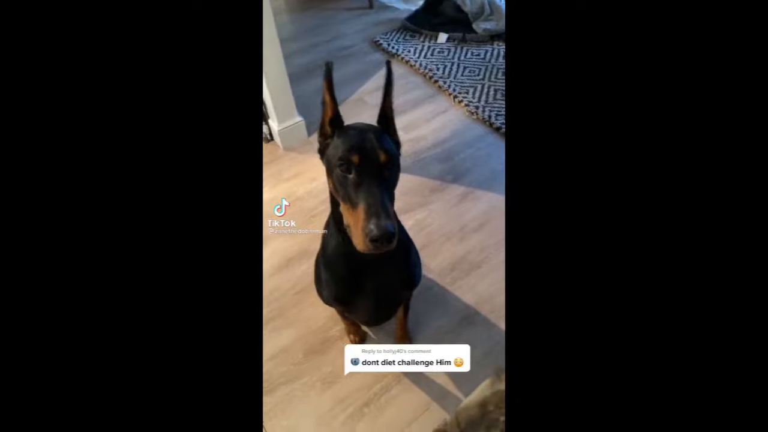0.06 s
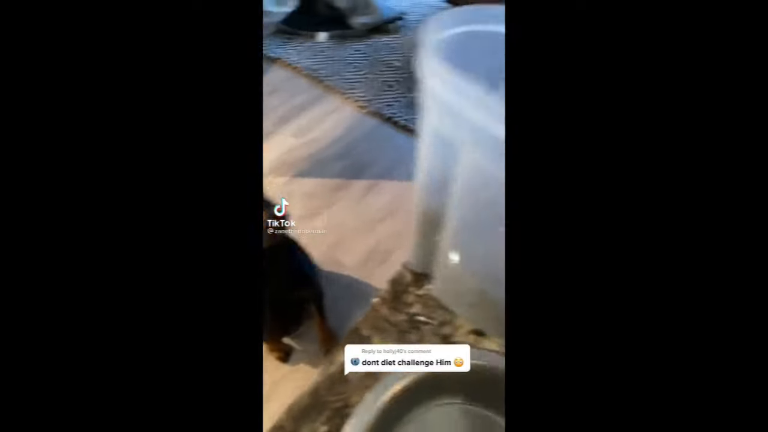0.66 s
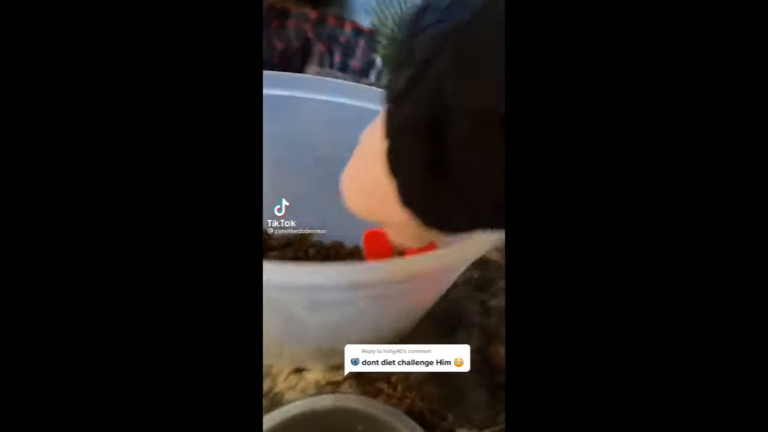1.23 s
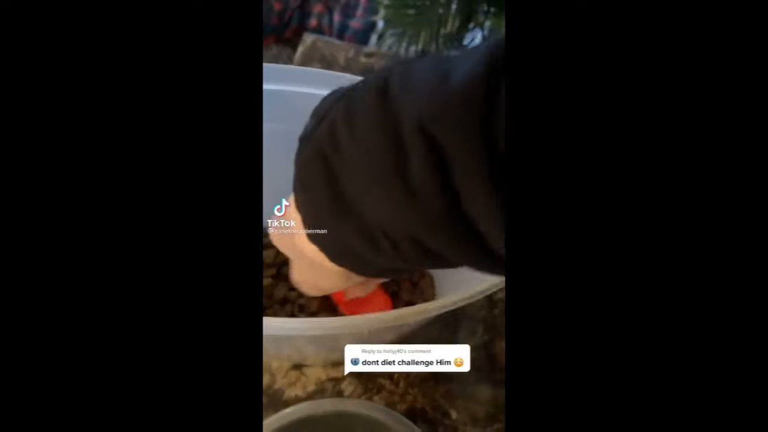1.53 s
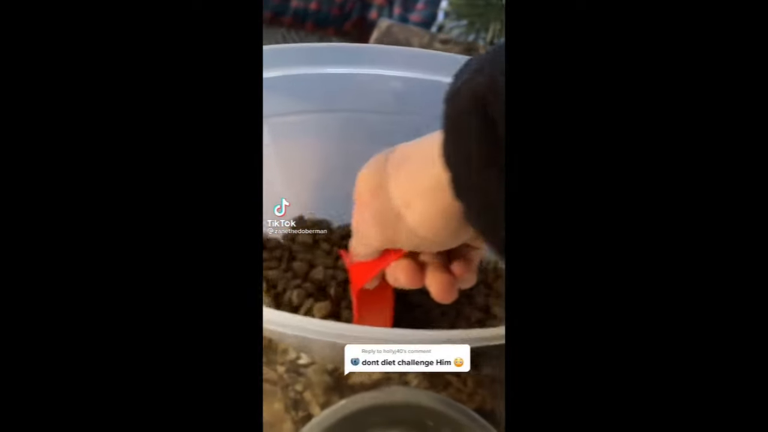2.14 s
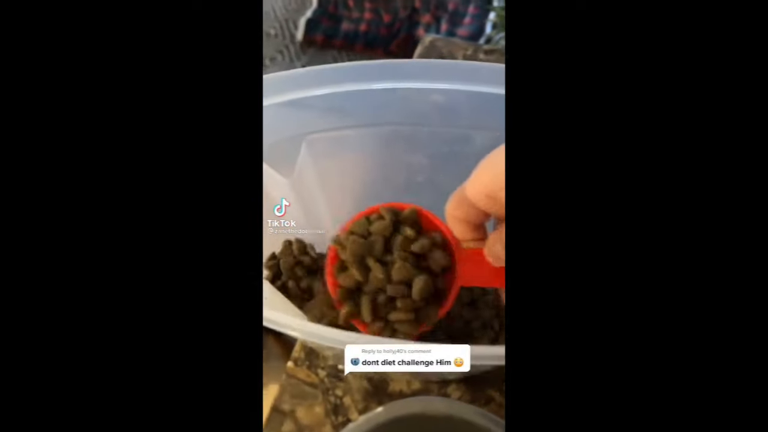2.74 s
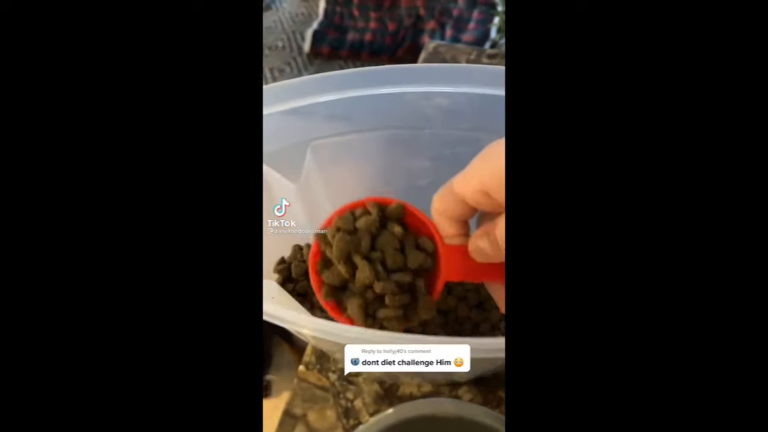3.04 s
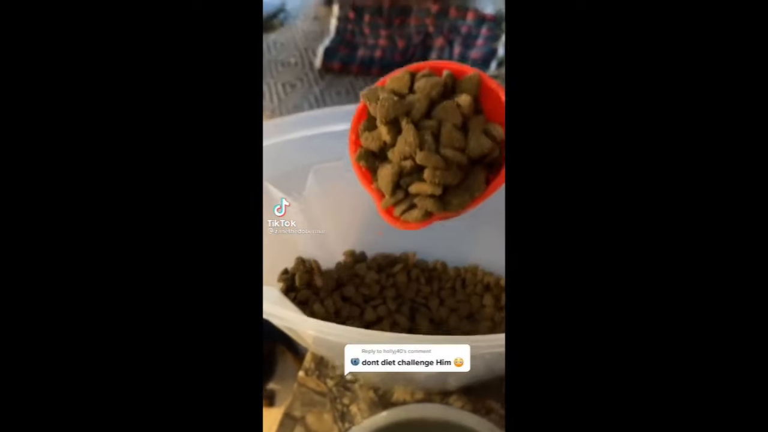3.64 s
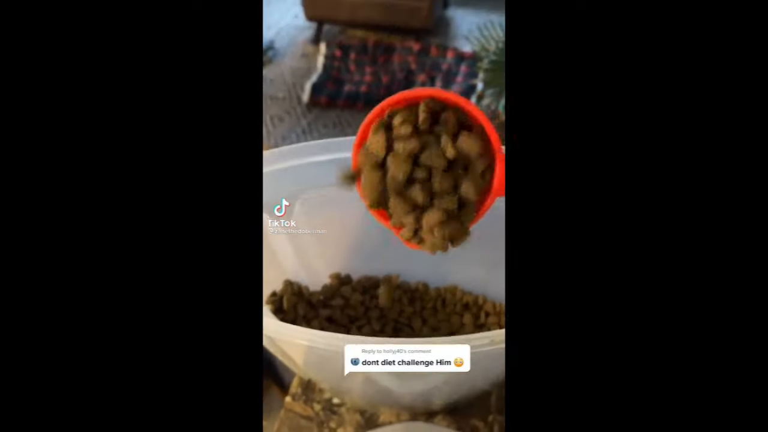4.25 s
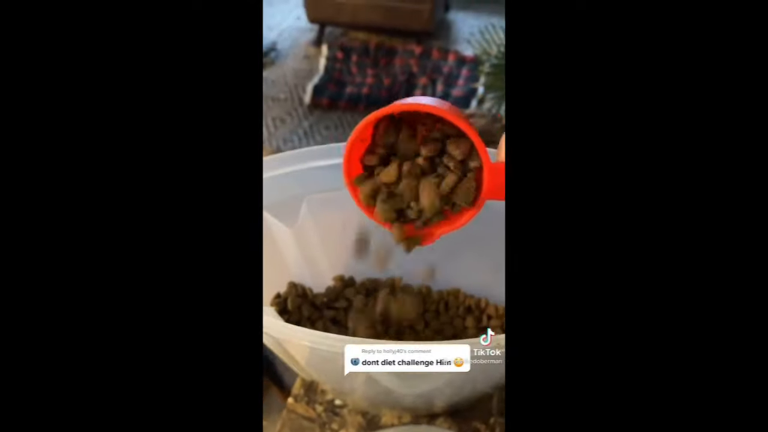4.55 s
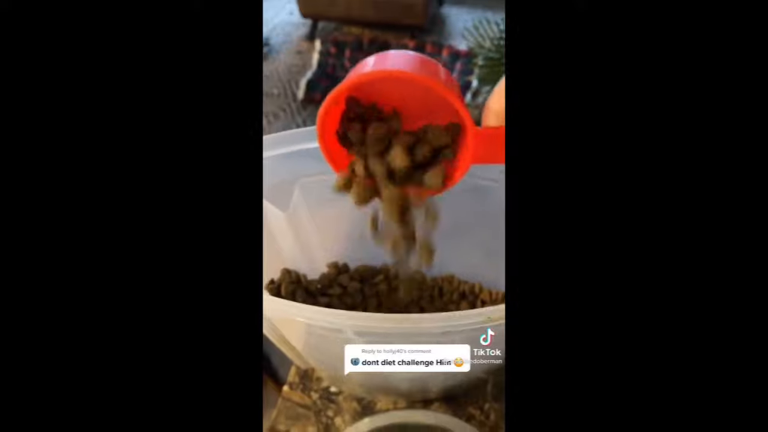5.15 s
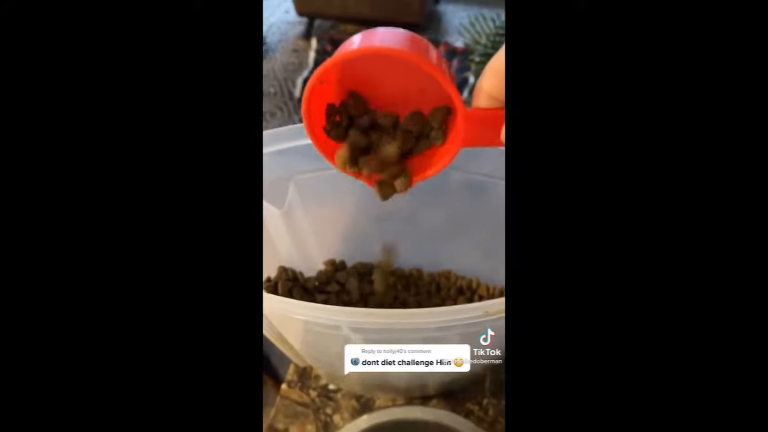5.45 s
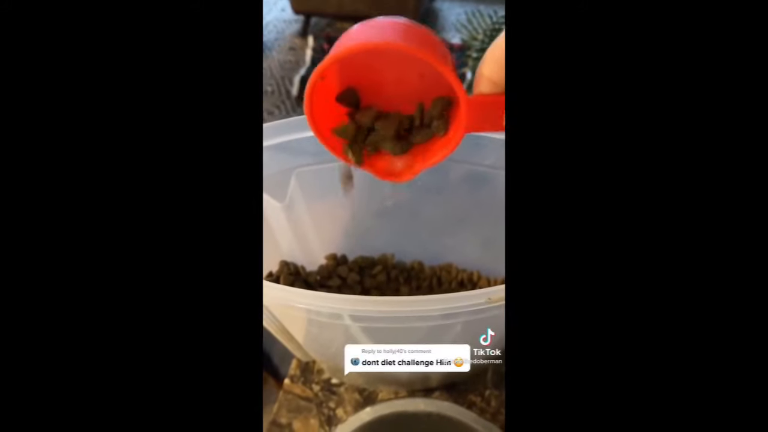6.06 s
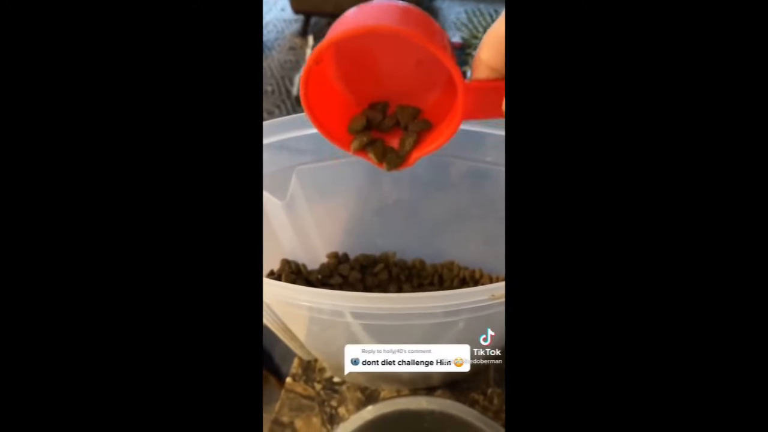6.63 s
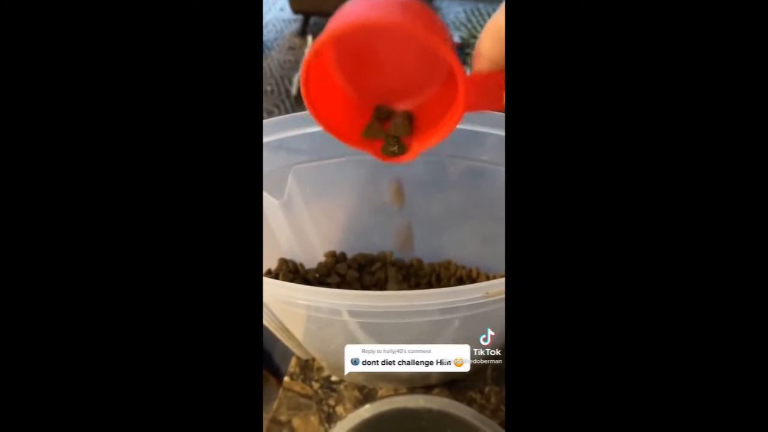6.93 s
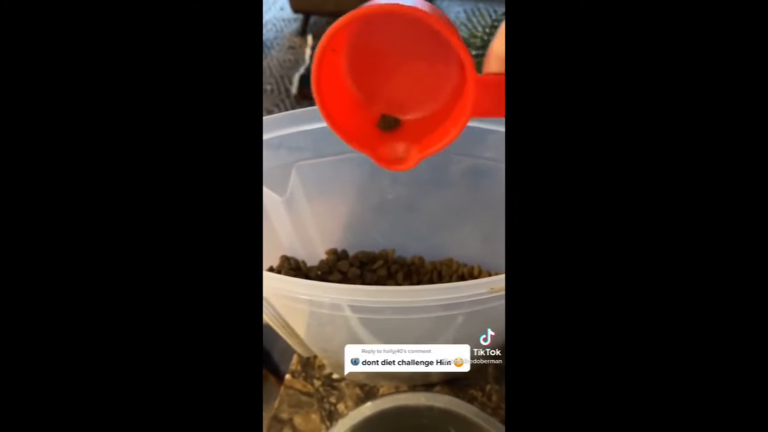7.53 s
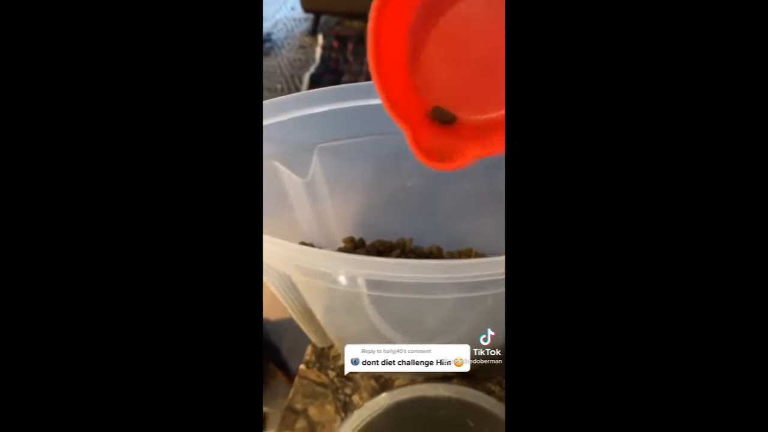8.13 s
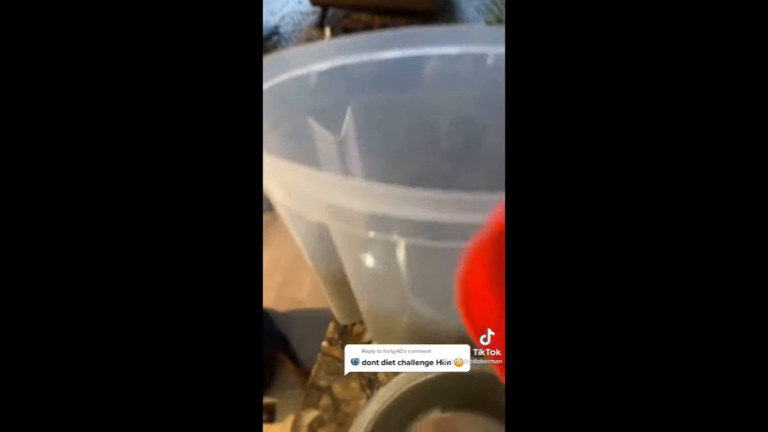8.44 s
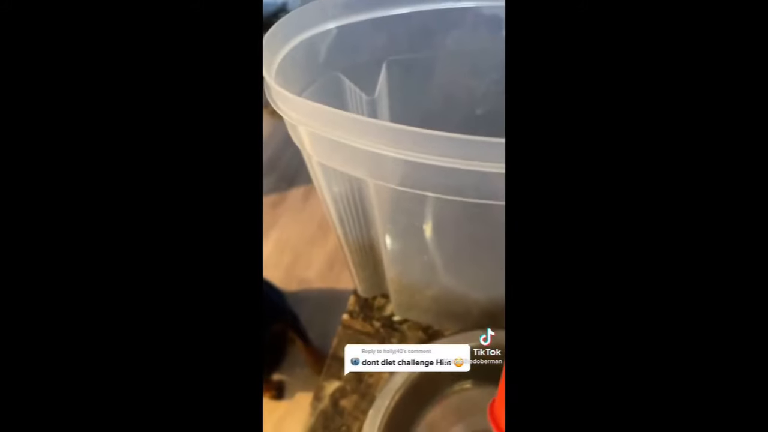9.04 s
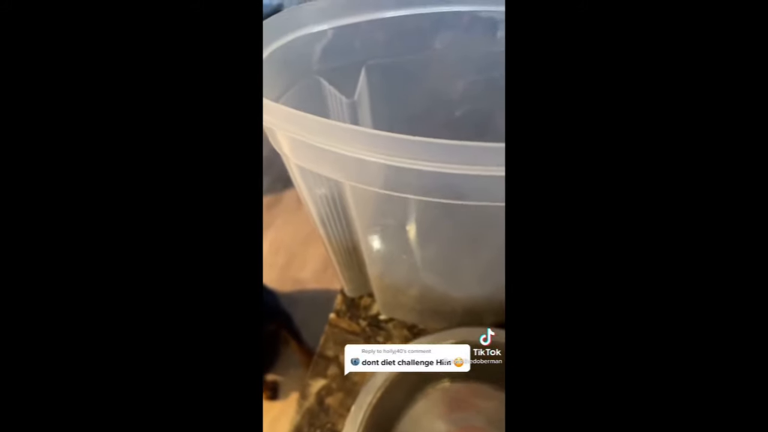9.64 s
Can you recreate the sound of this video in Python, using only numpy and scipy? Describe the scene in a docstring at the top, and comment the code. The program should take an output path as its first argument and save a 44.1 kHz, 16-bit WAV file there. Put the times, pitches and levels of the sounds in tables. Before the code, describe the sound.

A plastic scoop crunches through dry dog food in a bin and trickles it back, then one pellet bounces in a ringing steel bowl.

```python
"""A small room with a low hum. Close by, a plastic scoop digs into dry dog food in a plastic bin,
lifts a load and lets it trickle back. Pellets stick and slip, click on each other and on the scoop,
and thud on the heap, which drums the bin walls. A sleeve rustles; one last pellet drops into a
steel bowl, bounces and leaves it ringing."""
import sys
import numpy as np
from scipy import signal
from scipy.io import wavfile
from scipy.ndimage import uniform_filter1d

SR = 44100
rng = np.random.default_rng(int(sys.argv[2]) if len(sys.argv) > 2 else 0)


def transcribe(signal):
    """Save signal, clipped to [-1, 1], as a 16-bit WAV file at the path in sys.argv[1]."""
    frames = np.atleast_2d(signal).T
    limited = np.clip(frames, -1, 1)
    pcm = np.round(limited * 32767).astype(np.int16)
    wavfile.write(sys.argv[1], SR, pcm)


N = 431738
TIME_S, HIT_S = np.arange(N) / SR, np.arange(4096) / SR

# Table levels are relative; the functions add gains.
# scoop jabs: t/s, crunch/dB, boom/dB, grit/dB, settling/s
SCOOP_JABS = [(1.177, -31.5, -28.5, -53, 0.019), (1.264, -36, -31, -56, 0.048),
              (1.38, -35.5, -33.5, -50, 0.034), (1.431, -30, -37, -40, 0.011),
              (1.441, -16, -23, -27, 0.021), (1.47, -20, -11.5, -46, 0.0055),
              (1.616, -30, -23.5, -57, 0.028), (1.757, -22, -21.5, -41, 0.028),
              (1.772, -8, -10, -39, 0.014), (1.831, -21, -17, -44, 0.014),
              (8.319, -32.5, -29, -39.5, 0.046)]
# scoop pushing through the heap: t/s, crunch/dB, bin drumming/dB
DIG_ENVELOPE = [(1.1, -64, -59), (1.2, -50.5, -54), (1.29, -43, -49), (1.345, -59, -51.5),
                (1.529, -47.5, -36), (1.59, -47.5, -47), (1.645, -47.5, -36.5), (1.72, -52, -42),
                (1.836, -54, -39.5), (1.964, -49, -42), (2.15, -40, -35.5), (2.24, -34.5, -32),
                (2.33, -37.5, -36), (2.41, -41.5, -47), (2.532, -37.5, -41), (2.644, -31, -47),
                (2.728, -36.5, -45), (2.892, -45.5, -42.5), (2.95, -100, -74)]
# scoop rim rubbing the bin wall: t/s, level/dB
RUB_ENVELOPE = [(2.463, -63), (2.486, -26.5), (2.55, -50), (2.61, -31.5), (2.635, -86)]
# scoop on bin: t/s, crack/dB, crack/Hz, upper note/dB, edge/dB, wall/dB, boom/dB, boom/Hz
SCOOP_KNOCKS = [(0.936, -35, 2340, -59, -67, -34.5, -31.5, 257),
                (2.9967, -19, 3580, -27, -48, -34, -40.5, 300),
                (3.2013, -10.5, 2400, -20.5, -32, -18, -28, 288),
                (8.313, -32.5, 2030, -49, -48, -26.5, -20.5, 255)]
# hand and scoop bumping the bin through the heap: t/s, boom/dB, wall/dB
BIN_BUMPS = [(0.481, -37, -48), (0.551, -45, -47), (1.123, -39, -42), (1.178, -28, -28),
             (2.281, -24.5, -39), (2.762, -49, -22), (3.102, -45, -34.5), (3.465, -35.5, -47)]
# pellets on heap: t/s, clack/dB, clack/Hz, tick/dB, tick/Hz, edge/dB, wall/dB, boom/dB, boom/Hz
HEAP_HITS = [(4.449, -18, 2150, -25, 3200, -30.5, -14.5, -33, 332),
             (4.4609, -20, 1930, -26, 3050, -29, -24, -22, 330),
             (4.4743, -17.5, 1970, -18, 3400, -24, -15.5, -35, 348),
             (4.479, -18, 2130, -18, 3660, -21.5, -31, -28, 360),
             (4.499, -16.5, 1930, -23, 3300, -33, -23, -30, 346),
             (4.509, -13.5, 2070, -16, 3430, -32, -12.5, -42, 323),
             (4.5159, -18, 1980, -16.5, 3070, -27.5, -15, -20.5, 316),
             (4.5257, -18, 2060, -21, 3040, -31.5, -25, -28, 333),
             (4.5471, -22, 1910, -22, 3240, -42, -17, -31, 316),
             (4.5634, -29, 1980, -27, 3370, -51, -24, -23, 430),
             (4.576, -17.0, 1960, -23, 3230, -39, -13.5, -26.0, 320),
             (4.5953, -24, 1870, -34, 3540, -41, -21.5, -37, 316),
             (4.6412, -23, 2020, -33, 3600, -31, -17.5, -37.5, 370),
             (4.6478, -21.5, 2000, -36, 3080, -29, -21, -31, 330),
             (4.6935, -21.5, 1780, -29, 3300, -32, -25, -44, 380),
             (4.73, -33, 1900, -28, 3180, -34.5, -28, -45, 360),
             (4.735, -21, 1900, -30.0, 3120, -38.5, -28.5, -33, 368),
             (4.75, -26, 1820, -24.5, 3260, -38.0, -20.5, -38, 355),
             (4.7667, -20.0, 1970, -25, 3480, -35, -18, -41, 355),
             (4.7842, -31.0, 2130, -32.0, 3220, -41, -23, -42, 310),
             (4.8466, -35, 1960, -33, 3200, -45.5, -30.5, -45, 330),
             (4.9123, -19.5, 1710, -22.5, 3270, -31.0, -22, -33, 315),
             (4.9512, -16.5, 1810, -19, 3030, -40, -16.5, -32, 310),
             (5.06, -22, 1900, -25.5, 3280, -29.5, -24.5, -27.5, 316),
             (5.0905, -21, 1890, -26, 3240, -34, -17, -25.5, 316),
             (5.0974, -24, 1950, -25.5, 3360, -42, -21.5, -30, 340),
             (5.1121, -13.5, 1860, -15.5, 3410, -29.5, -16.5, -27.5, 350),
             (5.1312, -27, 2210, -22, 3510, -52, -21.5, -31.0, 313),
             (5.152, -29.5, 1880, -34, 3440, -63, -30.5, -46, 300),
             (5.203, -29.0, 2000, -23, 3460, -38, -24.5, -32, 307),
             (5.2577, -27.5, 1870, -22.0, 3330, -30, -22.5, -41.0, 337),
             (5.2667, -24.5, 1920, -24.5, 3340, -39.0, -28, -36.0, 345),
             (5.2988, -18.5, 1910, -24.5, 3400, -33, -25.0, -28, 327),
             (5.3429, -25.5, 1940, -30, 3320, -42.5, -20.5, -32, 320),
             (5.3969, -26, 1870, -38, 3470, -35.5, -23.5, -37, 300),
             (5.4419, -35.5, 1860, -42, 3280, -45, -29, -38, 335),
             (5.4949, -28, 1980, -26.5, 3220, -44, -24, -40, 340),
             (5.5306, -30.5, 1930, -38, 3420, -46.5, -26.5, -37.5, 394),
             (5.5509, -21.5, 1940, -23, 3620, -37, -21, -31, 292),
             (5.659, -32.5, 2200, -40, 3350, -38, -30.5, -33.5, 330),
             (5.759, -39, 2060, -38, 2980, -42, -32.5, -33, 314),
             (5.8262, -32, 1890, -50, 3310, -55, -31.5, -42.5, 312),
             (5.9213, -33.5, 1950, -41, 3370, -42.5, -33, -37.0, 323),
             (6.0139, -35, 1830, -38, 2890, -56.5, -30, -38.5, 315),
             (6.2109, -49, 2050, -44, 3350, -53, -42, -39.5, 370),
             (6.2898, -36.0, 1980, -39.5, 3210, -41.5, -37, -39, 330),
             (6.3044, -47, 1980, -41, 3290, -57.5, -46, -35, 314),
             (6.4482, -36, 2200, -39, 3460, -40.5, -25.5, -42, 300),
             (6.5456, -47.0, 2120, -45, 3650, -36.5, -32.5, -36.5, 342),
             (6.6147, -47, 2240, -44.5, 3300, -56.5, -44, -31, 312),
             (6.9208, -46.0, 2070, -46.5, 3140, -48, -38, -43, 307),
             (6.9314, -58, 1620, -46, 3770, -40, -41.5, -39, 318),
             (6.965, -44, 2200, -45, 3340, -42, -38, -36, 332),
             (6.978, -49, 2120, -44, 3190, -40, -39, -38.5, 320),
             (7.033, -21.5, 1880, -21.5, 2940, -34.5, -25, -32, 335),
             (7.0451, -25.5, 1930, -32, 2850, -42, -28, -49, 320),
             (7.055, -43, 1910, -43, 2820, -39, -26.5, -31.5, 304),
             (7.0858, -35, 2030, -25.5, 3380, -34, -43.0, -32.5, 318),
             (7.2508, -53, 2110, -46, 3620, -39, -44.5, -32.5, 303),
             (7.2863, -58, 2260, -45, 3180, -44.5, -43, -41, 318),
             (7.4031, -68, 2140, -57, 3320, -45, -46.5, -40.5, 300),
             (7.4605, -63, 2020, -41.5, 3720, -42, -41.5, -40.0, 320)]
# clumps spilling on the heap: t/s, length/s, level/dB
CLUMPS = [(4.427, 0.17, -25.5), (4.628, 0.14, -53), (5.068, .09, -34), (5.225, 0.13, -39)]
# pellets on scoop: t/s, clack/dB, clack/Hz, tick/dB, tick/Hz, edge/dB
SCOOP_HITS = [(0.4745, -48.5, 1980, -59, 3210, -63.0), (0.887, -45.0, 2210, -47, 3120, -54.5),
              (0.9029, -42.5, 2160, -52, 2840, -56), (0.9166, -40.5, 1650, -47, 3280, -62),
              (1.1975, -38.5, 1730, -36.0, 3030, -53.5), (1.8618, -26.0, 1890, -37, 2920, -46),
              (1.9323, -32, 1720, -31.5, 2900, -63), (1.947, -42, 1980, -39.5, 3270, -57),
              (1.9617, -34.0, 1750, -38, 2940, -57), (2.0001, -39.0, 2010, -42, 3180, -68),
              (2.2134, -29, 2170, -28.5, 2990, -46), (2.4524, -22, 2020, -33, 2980, -31),
              (2.476, -25.0, 2170, -40, 3070, -49), (2.4876, -26, 1970, -36, 3090, -50.5),
              (2.4932, -35, 2240, -34.0, 3100, -54), (2.5016, -38, 2210, -31, 3150, -50),
              (2.5073, -31, 2140, -31.0, 3340, -46), (2.517, -27.5, 2250, -34, 2910, -44),
              (2.5585, -25.0, 2030, -28.5, 3060, -56), (2.5733, -37, 1960, -26, 3860, -47),
              (2.584, -29, 2240, -28.5, 3040, -44), (2.589, -25.5, 1960, -25, 3000, -49),
              (2.5978, -26.5, 2190, -30, 3250, -57), (2.6199, -37, 1960, -36, 2810, -60),
              (2.6327, -28, 2160, -29.5, 2820, -56), (2.6464, -22.0, 1990, -37, 2970, -48),
              (2.6504, -26, 2110, -31.0, 3110, -40), (2.6576, -30, 1900, -24.5, 2960, -51),
              (2.6694, -34, 2120, -32, 2960, -51), (2.685, -38.0, 2210, -36, 3170, -51),
              (2.6976, -28, 2260, -20.5, 2770, -48), (2.7023, -45, 1660, -35, 2940, -46),
              (2.7091, -41, 2180, -25, 3040, -55), (2.7287, -35, 1870, -27, 3130, -46),
              (2.7401, -26.0, 2210, -21.5, 3340, -42), (2.761, -20, 2000, -26.5, 3110, -30.5),
              (2.7797, -35, 1810, -21, 3380, -33.5), (2.7895, -35, 2100, -31.5, 3400, -50),
              (2.7967, -25.5, 2100, -31, 3090, -40), (2.8092, -29.0, 2330, -32, 3460, -42.5),
              (2.8481, -23.5, 2140, -31, 3450, -39), (2.8627, -32.5, 1940, -41, 3320, -53),
              (2.8843, -27.5, 2000, -47, 3130, -61), (3.0905, -47, 2120, -56, 3470, -58),
              (3.3122, -42.0, 1720, -38, 2870, -48), (4.2946, -41, 1680, -30, 3150, -57.5),
              (4.3356, -49, 2130, -35.5, 3200, -43.5), (4.3888, -35.0, 2090, -37, 3220, -62),
              (4.3935, -32, 1940, -21, 3220, -47), (4.6552, -24, 1870, -22.0, 3430, -30),
              (4.6731, -32, 1890, -45, 3270, -59), (4.7032, -29, 1830, -31.0, 3360, -39),
              (4.7108, -39, 1890, -45, 3170, -52.5), (4.7463, -35, 1980, -25, 3240, -44.5),
              (4.8832, -46, 2260, -37, 2830, -38), (4.896, -36.5, 2000, -47, 3610, -42),
              (4.9336, -41, 2000, -41, 2940, -51), (4.9433, -26.5, 2030, -19.5, 3060, -50),
              (4.9833, -38, 1940, -39.5, 3080, -57), (5.0082, -38.5, 2050, -32.5, 3270, -59),
              (5.081, -31, 1810, -34, 3160, -53), (5.1954, -26.0, 1970, -21.5, 3260, -36),
              (5.243, -23.5, 1820, -24.5, 3000, -31), (5.5387, -43.5, 1960, -28.5, 3450, -48),
              (5.5703, -44, 2000, -23, 3410, -47), (5.5866, -44, 1950, -35, 3410, -59.5),
              (5.6173, -48, 1970, -35, 3440, -32.5), (5.6742, -34, 2000, -25, 3390, -31.0),
              (5.7177, -35.5, 1980, -31, 3330, -39.5), (5.7671, -32, 1920, -24.5, 3340, -39),
              (5.9039, -37, 1960, -32, 3040, -46), (6.0204, -29.5, 1910, -32.5, 3500, -55),
              (6.0322, -37.0, 1910, -43, 3480, -58), (6.0463, -34, 1950, -31.5, 3060, -59),
              (6.124, -40.0, 2080, -35, 3330, -61), (6.2406, -41, 1960, -30, 3410, -39.5),
              (6.327, -45, 2030, -48.5, 3460, -51), (6.3627, -40, 1930, -48.5, 3340, -55),
              (6.5552, -47, 2060, -38, 3300, -42), (6.6963, -76, 2000, -49.5, 3360, -66),
              (6.738, -63, 1940, -48.5, 3420, -56), (6.8369, -36, 2030, -37, 3460, -39),
              (6.8493, -35, 2060, -22.5, 3400, -36.5), (6.8666, -39, 2020, -29, 3330, -60),
              (7.1573, -54, 2040, -43.5, 3350, -72), (8.9051, -39.5, 2130, -33, 3420, -41)]
# pellets leaving the tilted scoop: t/s, level/dB
SLIDE_ENVELOPE = [(4.2, -90), (4.262, -64.5), (4.564, -43.5), (4.898, -54.5), (5.216, -50.5), (5.336, -41),
                  (5.602, -63), (5.833, -56.5), (6.099, -61), (6.35, -60.5), (7.1, -72.5), (7.3, -77)]
# pellets skidding on the scoop: t/s, swell length/s, rasp/dB, sandy treble/dB
SCOOP_SKIDS = [(0.853, 0.17, -49, -66), (4.2, 0.44, -45.5, -63), (4.417, 0.097, -28.5, -50),
               (5.076, 0.074, -46, -65.5), (5.227, 0.11, -45, -45.5), (6.189, 0.21, -56, -63.5),
               (6.524, 0.053, -44, -48), (6.683, 0.12, -61, -80), (6.847, 0.044, -40.5, -73),
               (7.09, 0.16, -61, -81)]
# pellet in the bowl: t/s, level/dB, treble/dB, share of long ring
BOWL_BOUNCES = [(9.0365, -7.5, -11, 0.96), (9.144, -15, -38, 1), (9.211, -27.5, -66, .7),
                (9.258, -37.5, -68, 1), (9.29, -25, -52, 1), (9.339, -35.5, -52, 1), (9.374, -42.5, -58, 1)]
# quick clang of the bowl: f/Hz, base hit/dB, side hit/dB
CLANG_MODES = [(1064, 1, -2.5), (1303, 4, 0.5), (1473, -0.5, 6), (1672, -0.5, 7), (1910, 3, -1),
               (2220, 4.5, -0.5), (3040, 1, -11), (3390, -0.5, -16), (3840, 2, -7), (4324, 4.5, -13),
               (4860, 8.5, -22), (5860, -8, -26), (6340, 4.5, -22), (7100, -5.5, -26), (7950, 1, -26),
               (8400, -3, -22), (9540, 4, -19), (9550, -0.5, -26), (10030, -2.5, -29), (10500, -4, -30),
               (12370, -10, -26)]
# resonances: f/Hz, level/dB, t60/s
RING_MODES = [(1010, -28, .25), (1092, -29, 0.59), (1275, -30, .9), (1316, -36, 1.2), (1460, -41.5, .7),
              (1500, -32.5, .3), (1723, -41, 0.46), (1776, -36, .3), (1860, -34, .3), (1890, -44.5, 1.4),
              (2170, -29.5, 0.28), (2229, -36.5, 1), (2940, -45, .7), (3480, -41.5, .35), (4270, -34, .2),
              (4900, -35.5, .3), (4900, -26, 0.34), (4970, -39, .35), (5860, -40, 0.37), (6440, -32, 0.312),
              (6420, -37.5, 0.33), (6630, -36.5, .35), (6877, -32, .2), (7970, -24.5, .21),
              (8944, -23.5, 0.19), (9100, -22, .16), (8960, -19.5, 0.23), (9030, -23, .16),
              (9200, -25, .15), (9900, -23, .15), (10260, -33.5, .15), (12500, -36, .25)]  # bowl, beating pairs
WALL_MODES = [(524, 0.5, 0.051), (786, 4, 0.028), (998, -6, 0.019)]  # bin wall
SHOVE_MODES = [(306.2, 9.5, 0.12), (229.0, -9.5, 0.94), (56.3, -13, 0.38)]  # shoved bin
# spectra: f/Hz, level/dB
CRUNCH_SPECTRUM = [(240, -22.5), (400, -7.5), (528, 3.5), (610, -9.5), (793, 4.5), (1000, -1), (1340, -6),
                   (2140, 0), (3450, -8.5), (4170, -16.5), (4760, -14.5), (5670, -22), (13000, -39.5)]
DRUM_SPECTRUM = [(20, -24.5), (48, -13.5), (100, -11.5), (180, -11), (240, 0), (305, 0.5), (380, -10),
                 (550, -15.5), (1000, -16.5), (3000, -51.5)]
SLIDE_SPECTRUM = [(180, -20), (300, 8.5), (398, 2), (521, 0.5), (650, -14), (810, 4), (1360, -14.5),
                  (1480, -19.5), (1870, -8), (2690, -13.5), (3400, -9.5), (4180, -15), (6000, -28),
                  (13000, -37)]
SCOOP_SPECTRUM = [(300, 2.5), (600, 1.5), (1000, 2), (1350, -5), (2000, -2), (2650, -4.5), (3350, -0.5),
                  (4300, -4), (5500, 3), (13000, 0.5)]
CLANG_SPECTRUM = [(300, -34.5), (620, -18.5), (900, -5), (1100, -14), (1500, -9), (2200, -6), (2650, -5),
                  (3100, -4.5), (4000, -10.5), (5000, -11), (5800, -16), (13000, -49)]
STEEL_EDGE_SPECTRUM = [(3000, -33), (5500, -6), (6400, 0), (7400, -3), (9200, -1.5), (10500, -2.5),
                       (13000, -10.5)]
CLOTH_SPECTRUM = [(240, -47.5), (400, -20.5), (559, -19.5), (793, -3), (1090, -11), (2040, 0),
                  (4110, -11.5), (13000, -14)]
AIR_SPECTRUM = [(15, -29.5), (25, -17.5), (64, -3.5), (103, -7), (152, -6), (208, -7), (244, -8),
                (293, -15.5), (361, -20), (507, -23.5), (625, -25.5), (855, -29.5), (1690, -29.5),
                (3510, -34), (13000, -68)]
# sleeve motion and room noise: t/s, level/dB
SLEEVE_ENVELOPE = [(7.5, -79), (7.619, -42.5), (7.78, -55), (7.92, -100), (8.102, -47.5), (8.311, -37),
                   (8.698, -40), (8.95, -94.5)]
AIR_ENVELOPE = [(0, -60), (.5, -50.5), (1.1, -47.5), (3.5, -47.5), (7.5, -49), (9.8, -47.5)]
# room hum: f/Hz, level/dB
HUM_BANDS = [(79, -61), (150, -55.5)]
# reverberation: f/Hz, t60/s
ROOM_DECAY = [(150, 0.36), (500, 0.57), (2000, 0.33), (3500, 0.23), (7000, 0.44), (13000, 0.67)]


def jabs(slips=4, gap_s=0.018, slip_s=0.011, rise_s=0.003):
    """Many pellets give way at once and shove the bin; the heap settles in weaker slips."""
    out = np.zeros(N)
    push = (1 - np.exp(-HIT_S / rise_s)) * np.exp(-HIT_S / slip_s)
    for s, crunch_db, boom_db, grit_db, settle_s in SCOOP_JABS:
        gaps_s = gap_s * rng.uniform(.7, 1.3, slips)
        for delay_s in np.cumsum(gaps_s) - gaps_s[0]:
            snaps = push * rng.standard_normal(len(HIT_S)) * (rng.random(len(HIT_S)) < 2500 / SR)
            crunch = amp(crunch_db - 2) * peaked(colour(snaps, CRUNCH_SPECTRUM))
            grit = amp(grit_db - 1) * peaked(band(snaps, 5300, 7960))
            shove = peaked(ring(SHOVE_MODES, HIT_S, detune=0.032))
            shove += 1.18 * peaked(band(burst(slip_s), 206, 390))
            slip = crunch + grit + amp(boom_db - 1) * peaked(shove)
            add(out, s - .001 + delay_s, np.exp(-delay_s / settle_s) * slip)
    return out


def digging(stick_db=3.5):
    """Pellets stick, grind and snap past the scoop, drumming the bin; the rim rubs the wall."""
    s, crunch_db, drum_db = np.transpose(DIG_ENVELOPE)
    stick_slip = amp(stick_db * np.clip(noise_band(7.7, 68, order=1), -2, 2))
    crunch = unit(colour(grains(per_s=1200, spread_db=-1), CRUNCH_SPECTRUM))
    snaps = np.zeros(N)
    for when, pitch, size in rng.random((480, 3)):
        snap = amp(13 * size ** 2 - 13) * ping(850 * 6 ** np.sqrt(pitch), 1)
        add(snaps, s[0] + when * (s[-1] - s[0]), snap)
    grind = (amp(-1.5) * crunch + amp(-7.5) * snaps) * stick_slip * envelope(s, crunch_db)
    drum = unit(colour(grains(per_s=980, spread_db=1), DRUM_SPECTRUM)) * envelope(s, drum_db)
    rub = noise_band(110, 190) * envelope(*np.transpose(RUB_ENVELOPE))
    return grind + amp(2) * drum + rub


def knocks(rebound_s=0.00157, rebound_db=-6):
    """Plastic on plastic: a dry double crack with a crisp edge, plus wall knock and boom."""
    out = np.zeros(N)
    for s, db, hz, upper_db, edge_db, wall_db, boom_db, boom_hz in SCOOP_KNOCKS:
        for delay_s, drop_db in (0, 0), (rebound_s, rebound_db):
            crack = amp(db) * ping(hz, 0.63) + amp(upper_db) * ping(4900, 1.6)
            add(out, s + delay_s, amp(drop_db) * crack)
        grit = amp(db - 8) * peaked(band(burst(0.0009), 1240, 3200))
        edge = amp(edge_db) * peaked(band(burst(0.004), 3800, 10400))
        side = amp(wall_db) * (wall(detune=0.017) + 1.3 * ping(875, 0.48))
        hollow = amp(boom_db) * boom(boom_hz, glide_hz=350, swell_s=0.0053)
        add(out, s, grit + edge + side + hollow)
    return out


def landings(heap_delay_s=0.00048):
    """Pellets fall on the heap, singly or in clumps. Returns clicks and bin thuds."""
    clicks, blows = np.zeros((2, N))
    for s, *contact, wall_db, boom_db, boom_hz in HEAP_HITS:
        add(clicks, s, click(*contact))
        blow = thud(boom_db, wall_db, boom_hz, hollow_db=-0.5, glide_hz=128, swell_s=0.0048)
        add(blows, s + heap_delay_s, blow)
    for clump in CLUMPS:
        for s, db in flurry(*clump):
            pitch = np.exp(rng.uniform(-.25, .25))
            add(clicks, s, click(db, 1800 * pitch, db - 2, 3200 * pitch, db - 17))
            add(blows, s + heap_delay_s, thud(db - 9, db - 4))
    return clicks, blows


def flurry(start_s, length_s, db, count=14, spread_db=10):
    """Times and levels of a run of unequal pellets, strongest mid-run."""
    jitter, size = rng.random((count, 2)).T
    along = (np.arange(count) + jitter) / count
    arch_db = 10 * np.log10(np.sin(np.pi * along))
    return zip(start_s + length_s * along, db + spread_db * (2 * size - 1) + arch_db)


def ticks():
    """Pellets hit the scoop as it fills and empties."""
    out = np.zeros(N)
    for s, *contact in SCOOP_HITS:
        add(out, s, click(*contact))
    return out


def click(clack_db, clack_hz, tick_db, tick_hz, edge_db):
    """A contact excites two short resonances; the rough crust adds crumbs and a crisp edge."""
    out = amp(edge_db) * sized(band(burst(0.0024), 3400, 6200, order=1))
    for db, hz, cycles in (clack_db, clack_hz, 1), (tick_db, tick_hz, 1.73):
        crumbs = sized(band(burst(0.0033), hz * 0.65, hz * 1.284))
        out += amp(db) * sized(sized(ping(hz, cycles)) + amp(-6) * crumbs)
    return out


def bumps():
    """Hand and scoop bump the bin through the heap."""
    out = np.zeros(N)
    for s, boom_db, wall_db in BIN_BUMPS:
        add(out, s, thud(boom_db, wall_db))
    return out


def thud(db, wall_db, boom_hz=305, hollow_db=-5, glide_hz=260, swell_s=0.0054):
    """A blow through the heap: wall knock, boom, low push of the whole bin. Each spot differs."""
    pitch, stretch = np.exp(rng.uniform(-1, 1, 2) * [.05, .45])
    hollow = boom(boom_hz * pitch, glide_hz, swell_s * stretch)
    hollow += amp(-10) * peaked(band(burst(0.019), 207, 570))
    knock = amp(wall_db - 1) * wall(detune=0.054)
    push = amp(db - 13) * ping(170 * pitch, 0.62)
    return amp(db + hollow_db) * hollow + knock + push


def boom(hz, glide_hz, swell_s, glide_s=0.0032):
    """Slow bending waves of the bin: a hollow note sinking in pitch."""
    turns = np.cumsum(hz + glide_hz * np.exp(-HIT_S / glide_s)) / SR
    return peaked(np.sin(2 * np.pi * turns) * HIT_S * np.exp(-HIT_S / swell_s))


def wall(detune):
    """Dull knock of the bin's side: damped modes plus noise."""
    modes = peaked(ring(WALL_MODES, HIT_S, detune))
    return peaked(modes + 0.44 * peaked(band(burst(0.0043), 442, 943, order=3)))


def sliding():
    """Fine rattle of the load creeping over the lip."""
    rattle = unit(colour(grains(per_s=900, spread_db=9.5), SLIDE_SPECTRUM))
    return amp(4) * rattle * envelope(*np.transpose(SLIDE_ENVELOPE))


def skids(slips_per_s=900):
    """Rough crust drags on plastic: a swelling, fading run of tiny slips."""
    out, t = np.zeros(N), TIME_S[:SR // 3]
    for s, length_s, rasp_db, sand_db in SCOOP_SKIDS:
        slips = rng.standard_normal(len(t)) * (rng.random(len(t)) < slips_per_s / SR)
        rasp = unit(band(slips, 2640, 3400) + band(slips, 1500, 2330) + .5 * band(slips, 620, 3500))
        sand = unit(band(slips, 4000, 12000, order=1))
        swell = np.sin(np.pi * np.clip(t / length_s, 0, 1))
        add(out, s, swell * (amp(rasp_db) * rasp + amp(sand_db) * sand))
    return out


def scoop_hollow(pellets, tail_db=-7, t60_s=0.25):
    """The scoop's hollow rings after each click, more as it empties."""
    drive = pellets * np.interp(TIME_S, [3.3, 4.4, 5.6, 7.5, 8.3], [0.035, 0.09, 0.37, 0.94, 0.5])
    out, t = np.zeros(N), TIME_S[:SR // 3]
    for hz, width_hz, db in [(3280, 200, -28), (1930, 100, -38.5)]:
        note = np.cos(2 * np.pi * hz * t) * np.exp(-np.pi * width_hz * t)
        tail = band(rng.standard_normal(len(t)), hz - width_hz / 2, hz + width_hz / 2)
        tail *= amp(-60 * t / t60_s)
        response = note / np.linalg.norm(note) + amp(tail_db) * tail / np.linalg.norm(tail)
        out += amp(db) * signal.oaconvolve(drive, response)[:N]
    return out


def bowl(chatter_s=0.0071, clang_t60_s=0.04, shimmer_t60_s=0.9):
    """At each bounce the pellet chatters on the steel and leaves it ringing."""
    out, t = np.zeros(N), TIME_S[:32768]
    hz, base_db, side_db = np.transpose(CLANG_MODES)[:, :, None]
    ring_hz, ring_db, ring_t60_s = np.transpose(RING_MODES)
    contact = np.exp(-np.maximum(HIT_S - chatter_s, 0) / 0.0052) + 0.18 * np.exp(-HIT_S / 0.03)
    # out-of-round bowl: each mode splits into a beating cluster
    split_hz = hz[:, :, None] * (1 + .014 * rng.uniform(-1, 1, (len(hz), 5, 1)))
    clusters = np.sin(2 * np.pi * (split_hz * t + rng.random(split_hz.shape))).sum(1)
    clang = clusters * amp(-60 * t / clang_t60_s) * (1 - np.exp(-t / 0.0023))
    clang /= np.linalg.norm(clang, axis=1, keepdims=True)
    for index, (s, db, treble_db, ring_share) in enumerate(BOWL_BOUNCES):
        rattle, edge = rng.standard_normal((2, len(HIT_S))) * contact
        add(out, s, amp(db - 11) * peaked(colour(rattle, CLANG_SPECTRUM)))
        add(out, s, amp(treble_db - 4) * peaked(colour(edge, STEEL_EDGE_SPECTRUM)))
        # base first, then the side
        spot = amp(side_db if index else base_db) * rng.choice([-1, 1], hz.shape)
        add(out, s, amp(db - 1.5) * peaked((spot * clang).sum(0)))
        # soft bounces ring only the low modes
        soft_db = min(treble_db - db + 9, 0) * np.clip(np.log(ring_hz / 2300) / np.log(3.3), 0, 1)
        modes = np.c_[ring_hz, ring_db + soft_db, ring_t60_s]
        add(out, s, amp(db) * ring_share * ring(modes, t, detune=0))
        weak_modes = rng.standard_normal(len(t)) * amp(-60 * t / shimmer_t60_s)
        shimmer = colour(weak_modes, CLANG_SPECTRUM) + 0.15 * colour(weak_modes, STEEL_EDGE_SPECTRUM)
        add(out, s, amp(db - 35) * peaked(shimmer))
        floor_thump = peaked(band(burst(0.033), 320, 467))
        add(out, s + 0.0076, amp(db - 27) * floor_thump)
    # the first blow flexes the flat base: a clonk
    s, db = BOWL_BOUNCES[0][:2]
    add(out, s + 0.0019, amp(db - 9) * ping(1080, 4.5))
    return out


def sleeve():
    """Cloth hiss as the arm swings to the bowl."""
    rustle = unit(colour(grains(per_s=1400, spread_db=0), CLOTH_SPECTRUM))
    return amp(-20.5) * rustle * envelope(*np.transpose(SLEEVE_ENVELOPE))


def room(x, near_db=-8, tail_db=-17, damp_hz=8000):
    """Adds quick bin-wall echoes and a small room's tail."""
    t = TIME_S[:SR // 2]
    taps = rng.choice([-1., 1.], len(t)) * (rng.random(len(t)) < 3000 / SR)
    near = taps * (t > .002) * np.exp(-t / 0.0021)
    hz, frame_s, spectrum = signal.stft(taps * (t > .008), SR, nperseg=256)
    decay = amp(-60 * frame_s / at_hz(ROOM_DECAY, hz)[:, None])
    tail = signal.istft(spectrum * decay, SR, nperseg=256)[1][:len(t)]
    tail = band(tail, 60, damp_hz, order=1)
    echo = amp(near_db) * near / np.linalg.norm(near) + amp(tail_db) * tail / np.linalg.norm(tail)
    return x + signal.oaconvolve(x, echo)[:N]


def air():
    """Low room noise and wavering hum, rising over the first second; steady faint hiss."""
    noise = unit(colour(rng.standard_normal(N), AIR_SPECTRUM))
    hum = sum(amp(db) * noise_band(hz - 4, hz + 4) for hz, db in HUM_BANDS)
    gain = amp(np.interp(TIME_S, *np.transpose(AIR_ENVELOPE)))
    hiss = amp(-72.5) * noise_band(800, 16000, order=1)
    return gain * (amp(-3) * noise + hum / gain.max()) + hiss


def ping(hz, cycles):
    """Short tone, peaking after the given cycles."""
    turns = HIT_S * hz
    return peaked(np.sin(2 * np.pi * (turns + rng.random())) * turns * np.exp(-turns / cycles))


def ring(modes, t, detune):
    """Decaying modes; random signs and detuning vary the struck spot."""
    hz, db, t60_s = np.transpose(modes)[:, :, None]
    hz = hz * (1 + detune * rng.standard_normal(hz.shape))
    signs = rng.choice([-1, 1], hz.shape)
    return (signs * amp(db - 60 * t / t60_s) * np.sin(2 * np.pi * hz * t)).sum(0)


def burst(decay_s):
    """Crumbly contact: decaying noise."""
    return rng.standard_normal(len(HIT_S)) * np.exp(-HIT_S / decay_s)


def grains(per_s, spread_db):
    """Random tiny impacts."""
    size = amp(spread_db * np.minimum(rng.exponential(1, N), 3.5))
    return size * rng.choice([-1, 1], N) * (rng.random(N) < per_s / SR)


def noise_band(lo_hz, hi_hz, order=2):
    """Band noise, rms 1."""
    return unit(band(rng.standard_normal(N), lo_hz, hi_hz, order))


def band(x, lo_hz, hi_hz, order=2):
    """Band-pass, edges at 10 Hz or above."""
    return signal.lfilter(*signal.butter(order, np.maximum([lo_hz, hi_hz], 10), "band", fs=SR), x)


def colour(x, spectrum):
    """Minimum-phase filter with the given spectrum."""
    log_gain = np.log(amp(at_hz(spectrum, abs(np.fft.fftfreq(4096, 1 / SR)))))
    taps = np.fft.ifft(np.exp(np.conj(signal.hilbert(log_gain)))).real
    return signal.oaconvolve(x, taps[:2048])[:len(x)]


def at_hz(table, hz):
    """Table lookup on a log-frequency axis."""
    table_hz, value = np.transpose(table)
    return np.interp(np.log(hz + 1), np.log(table_hz + 1), value)


def envelope(s, db):
    """Gain curve, -120 dB outside its span."""
    return amp(np.interp(TIME_S, s, db, left=-120, right=-120))


def add(mix, s, sound):
    """Mixes a sound in at time s."""
    part = mix[round(s * SR):][:len(sound)]
    part += sound[:len(part)]


def amp(db):
    """dB to gain."""
    return 10 ** (np.asarray(db) / 20)


def unit(x):
    """Scales to rms 1."""
    return x / np.sqrt(np.mean(x ** 2) + 1e-20)


def peaked(x):
    """Scales the loudest millisecond to rms 1."""
    return x / np.sqrt(uniform_filter1d(x ** 2, size=44).max() + 1e-20)


def sized(x):
    """Scales to the energy of 2 ms at rms 1."""
    return x / np.sqrt(np.sum(x ** 2) / (SR * .002))


def scene():
    """All sources in the room, mono; knocks closest and driest."""
    clicks, heap = landings()
    pellets = clicks + ticks() + colour(sliding() + skids(), SCOOP_SPECTRUM)
    blows = band(heap + bumps(), 191, 12000)  # small objects radiate no deep bass
    food = room(pellets + scoop_hollow(pellets) + blows + jabs() + digging() + bowl() + sleeve())
    close = room(knocks(), near_db=-12.5, tail_db=-23, damp_hz=3000)
    return (food + close + air())[None]


def record(dry):
    """Soft clip, then 13.2 kHz low-pass."""
    low_pass = signal.firwin(255, 13200, window=("kaiser", 8), fs=SR)
    return signal.oaconvolve(np.tanh(dry), low_pass[None], "same")


dry = scene()
out = record(dry)
transcribe(out)
```